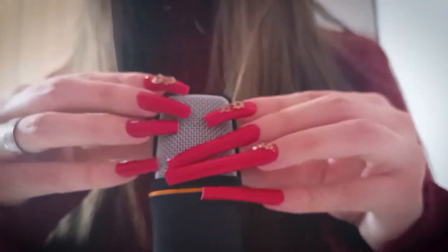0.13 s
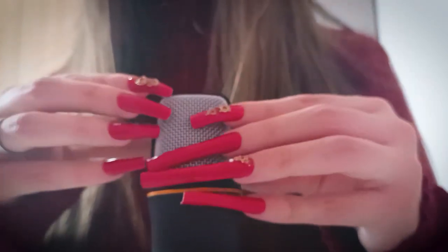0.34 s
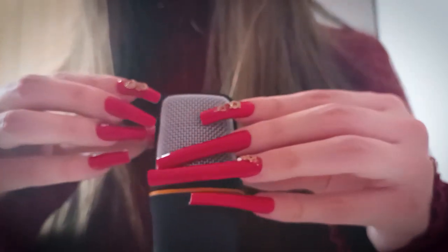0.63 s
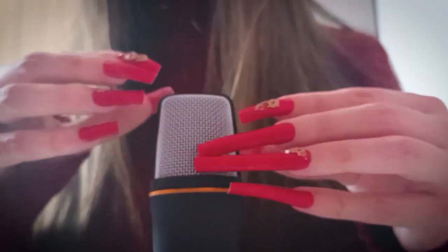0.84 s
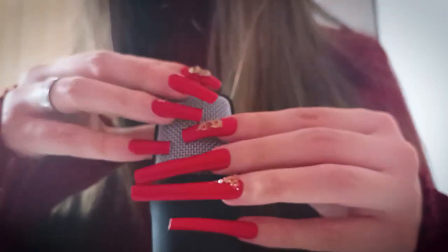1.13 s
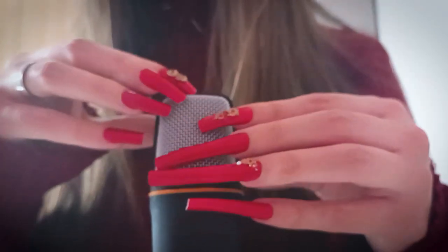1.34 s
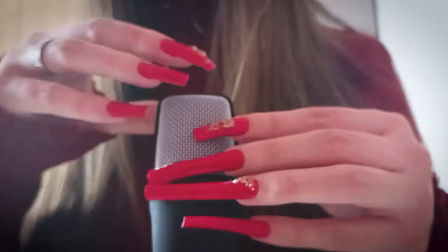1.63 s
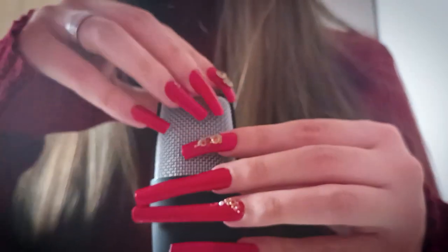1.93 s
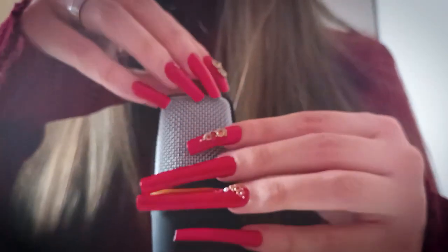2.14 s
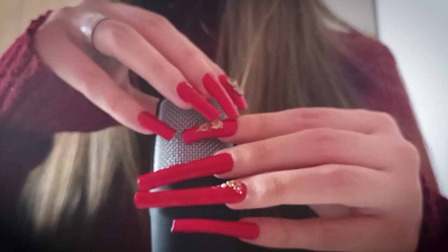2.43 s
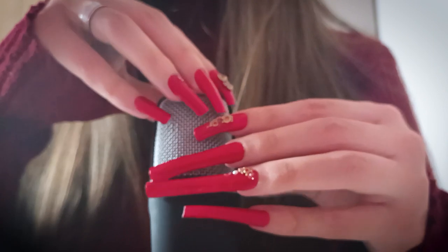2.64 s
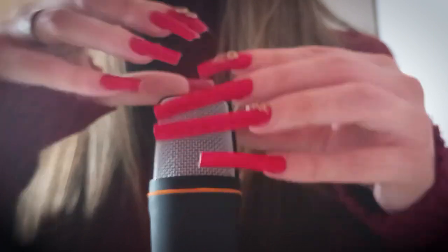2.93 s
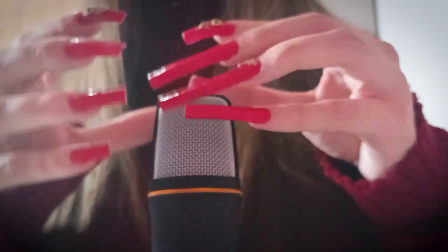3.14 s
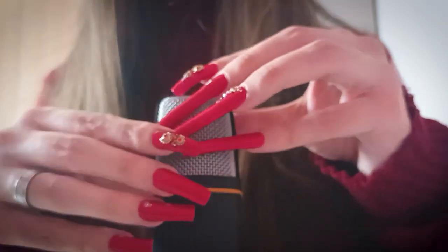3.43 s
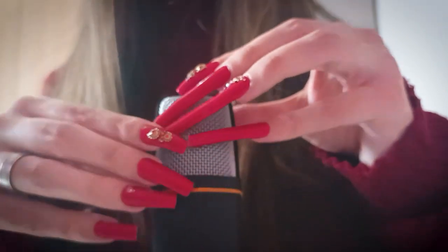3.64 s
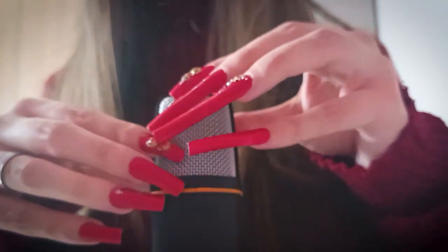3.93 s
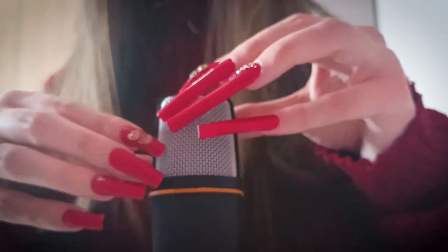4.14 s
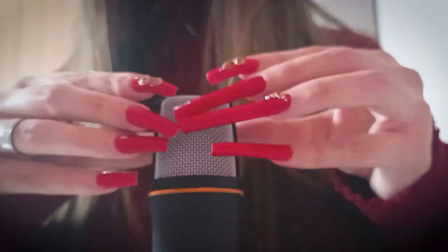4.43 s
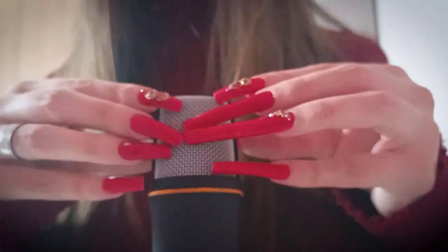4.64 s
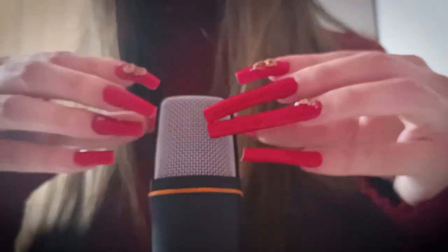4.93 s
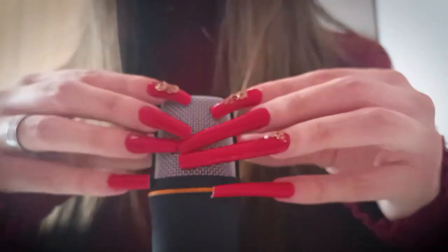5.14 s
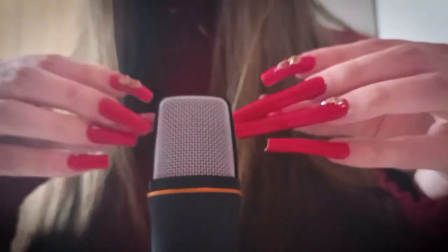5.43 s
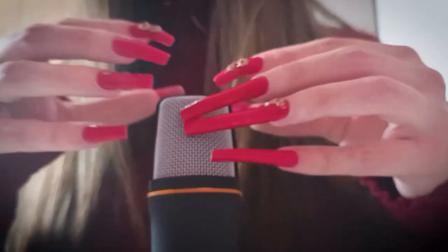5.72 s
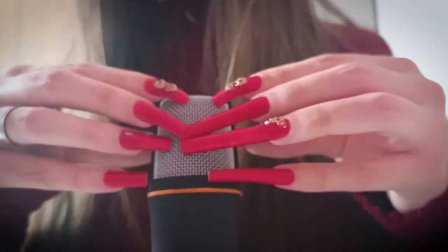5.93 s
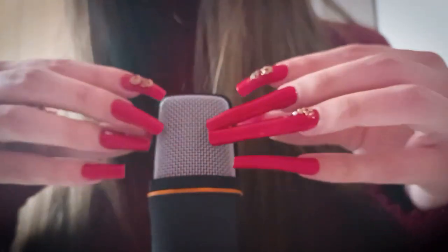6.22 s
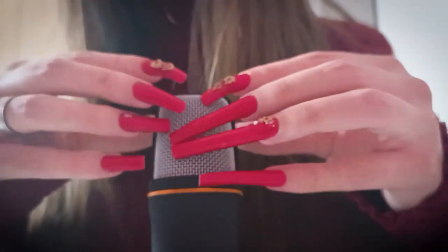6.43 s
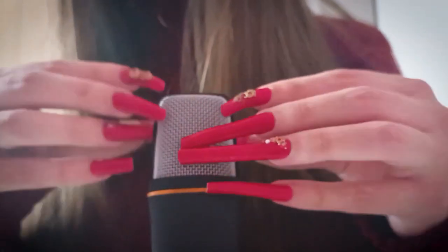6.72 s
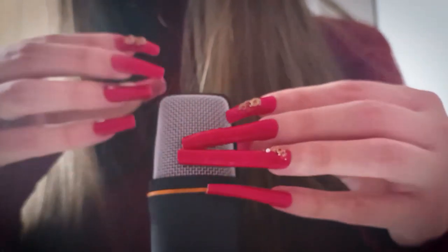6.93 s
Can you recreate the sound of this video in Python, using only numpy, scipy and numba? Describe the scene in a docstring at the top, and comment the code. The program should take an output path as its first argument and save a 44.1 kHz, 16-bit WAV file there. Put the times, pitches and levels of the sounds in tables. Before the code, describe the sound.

Long fingernails scratch directly on the wire mesh of a microphone in quick, uneven strokes with short pauses. Each stroke is a bright, gritty rasp full of tiny clicks as the nails catch and slip, ringing the metal slightly. Finger pressure adds a low rumble, with a few soft bumps just past the middle. The sound is very close and dry, with faint room hiss behind it.

```python
"""Long fingernails scratch right on the wire mesh of a microphone, stroke after stroke with short pauses.
A nail catches on a wire and slips off: a burst of tiny knocks rings the mesh and the basket under it,
and at times the nail itself sings. Finger pressure rumbles through the microphone body, with a few bumps.
Behind it a quiet room hisses and hums; a faint low tone sounds once. Mono, through a quick limiter."""
import sys
import numpy as np
from scipy import signal
from scipy.fft import rfft, irfft
from scipy.io import wavfile
from scipy.ndimage import uniform_filter1d, minimum_filter1d
from numba import njit

SR = 44100
rng = np.random.default_rng(int(sys.argv[2]) if len(sys.argv) > 2 else 0)


def master_out(mix):
    """Clip the mix to full scale and print it as 16-bit PCM to the path in sys.argv[1]."""
    frames = np.transpose(np.atleast_2d(mix))
    ceiling = np.clip(frames, -1, 1)
    pcm = np.round(ceiling * 32767).astype(np.int16)
    wavfile.write(sys.argv[1], SR, pcm)


N = 312228


def undb(db):
    """Decibels to amplitude."""
    return np.exp(np.asarray(db) * np.log(10) / 20)


def unit(x):
    """Scale to an RMS of 1."""
    return x / np.sqrt(np.mean(x ** 2))


def resonate(x, hz, width_hz):
    """Two-pole resonance, gain 1 at the centre."""
    return signal.lfilter(*signal.iirpeak(hz, hz / width_hz, fs=SR), x)


def butter(x, hz, kind, order=4):
    """Butterworth low-pass or high-pass."""
    return signal.sosfilt(signal.butter(order, hz, kind, fs=SR, output="sos"), x)


def wander(rate_hz):
    """Random levels held 1 / rate_hz seconds and slewed; spread near 1."""
    hold = int(SR / rate_hz)
    return uniform_filter1d(np.repeat(rng.standard_normal(N // hold + 1), hold), hold // 4 + 1)[:N]


def bursts(times, sizes, rise_s, fall_s):
    """Envelope of knocks: each builds up to its time and dies away."""
    spikes = np.zeros(N)
    np.add.at(spikes, np.minimum((times * SR).astype(int), N - 1), sizes)
    t = np.arange(-1000, 1001) / SR
    shape = np.exp(np.where(t < 0, t / rise_s, -t / fall_s))
    return np.abs(signal.oaconvolve(spikes, shape, "same"))


@njit
def drifting_mode(x, hz, width_hz):
    """Resonance whose centre and width move every sample."""
    y, band_state, low_state = np.empty(len(x)), 0., 0.
    for i in range(len(x)):
        g, loss = np.tan(np.pi * hz[i] / SR), width_hz[i] / hz[i]
        band = (band_state + g * (x[i] - low_state)) / (1 + g * (g + loss))
        band_state = 2 * band - band_state
        low_state += 2 * g * band
        y[i] = loss * band
    return y


def room_tone(hiss_db=-61.5, hum_hz=119, hum_db=-78):
    """The quiet room around the microphone: a soft hiss that swells slowly, and a hum."""
    # spectrum of the hiss: (frequency [Hz], relative density [dB])
    spectrum = [(24, -43.5), (55, -13), (124, -4), (151, -22), (294, -10), (384, -24), (448, -18),
                (2470, -27), (3760, -20.5), (7000, -40.5), (10400, -77.5)]
    hz, db = np.transpose(spectrum)
    bin_hz = np.arange(N // 2 + 1) * SR / N + 1
    colour = undb(np.interp(np.log(bin_hz), np.log(hz), db))
    hiss = unit(irfft(rfft(rng.standard_normal(N)) * colour, N))
    hum = np.sin(2 * np.pi * hum_hz * np.arange(N) / SR)
    return undb(hiss_db + 1.1 * wander(1.4)) * hiss + undb(hum_db) * hum


def room_dip(drag, dip_db=-4, hold_s=0.1347):
    """Gain of the room tone: it dips while the nails drag and for a moment after."""
    span = int(hold_s * SR) // 2 * 2 + 1
    idle = minimum_filter1d(1. * (drag < 1e-3), span, origin=span // 2)
    return undb(dip_db * (1 - uniform_filter1d(idle, size=441)))


def faint_tone(centre_s=5.47, half_length_s=.035, hz=430, db=-52):
    """A soft, slightly wavering low tone after one stroke."""
    shape = np.exp(-((np.arange(N) / SR - centre_s) / half_length_s) ** 4)
    return undb(db) * shape * unit(resonate(rng.standard_normal(N), hz, width_hz=6.2))


def finger_bumps():
    """A finger bumps the microphone: a short shove, then the body swings out."""
    # bumps on the body: (time [s], relative level [dB])
    bumps = [(4.079, -8.5), (4.112, -10.5), (4.148, -2)]
    times, db = np.transpose(bumps)
    shove = butter(bursts(times, undb(db), 0.00038, 0.00017), 60, "high", order=2)
    return shove + undb(1.5) * resonate(shove, hz=140, width_hz=60)


def handling_rumble(slip):
    """Finger pressure shakes the microphone body in uneven low thuds, harder on each slip."""
    pressure = rng.standard_normal(N) * undb(4.3 * np.minimum(wander(40), 1)) * slip ** 0.43
    shake = butter(butter(pressure, 58, "high"), 780, "low")
    return unit(resonate(shake, 110, 130) + undb(-28) * resonate(shake, 390, 430))


def stroke_gains(top_share=0.666, ease_db=4, lift_db_per_s=1505):
    """Gains of basket drag, mesh drag and rumble: a stroke swells, eases off and stops as the nails lift."""
    # strokes over the mesh, with the relative levels at their tops:
    # (start [s], length [s], basket drag [dB], mesh drag [dB], rumble [dB], swell from start to top [dB])
    strokes = [(0, 0.048, -28.5, -29, -48, -0.5), (0.066, 0.061, -38, -45.5, -42, -4),
               (0.151, 0.16, -34, -38, -40.5, 13.5), (0.266, 0.1475, -25, -34.5, -34.5, 4.5),
               (0.459, 0.06, -42.5, -46.5, -37.5, 6), (0.516, 0.2964, -28, -27, -35, 2.5),
               (0.791, 0.061, -39.5, -51.5, -76.5, 7.5), (1.055, 0.021, -27, -30.5, -43.5, 8),
               (1.097, 0.061, -42.5, -45, -34.5, 7.5), (1.162, 0.314, -29.5, -30.5, -31.5, 2),
               (1.495, 0.22, -27.5, -27.5, -41, 6.5), (1.731, 0.13, -56.5, -56.5, -46.5, 2.5),
               (1.83, 0.0293, -42, -35, -44.5, -3), (1.885, 0.2, -26.5, -27.5, -30.5, 7.5),
               (2.107, 0.037, -25.5, -29.5, -34, 2), (2.169, 0.024, -21, -23.5, -41, -2.5),
               (2.303, 0.1464, -34, -38.5, -50.5, -3.5), (2.472, 0.128, -37, -51.5, -47.5, 3),
               (2.566, 0.25, -37, -41.5, -39.5, 1), (2.698, 0.1286, -21, -24, -32.5, 4),
               (3.1512, 0.127, -39.5, -35, -66.5, 0.5), (3.304, 0.077, -35.5, -46.5, -50.5, 3),
               (3.394, .15, -33, -30, -38, 4.5), (3.551, 0.16, -30, -30, -34, 13.5),
               (3.902, 0.044, -27.5, -29.5, -33.5, 3), (3.971, 0.077, -41.5, -52, -34, 6),
               (4.001, 0.23156, -27.5, -24, -35.5, 5), (4.498, 0.11, -30, -33, -34.5, 6.5),
               (4.616, 0.21605, -26.5, -24, -35, 7), (5.122, 0.29555, -24.5, -21.5, -30, 12.5),
               (5.721, 0.1342, -36, -36.5, -57.5, -1.5), (5.905, 0.26915, -28, -25.5, -34.5, 3.5),
               (6.267, 0.2, -37, -35.5, -53, 1), (6.442, 0.29, -25.5, -24.5, -34.5, 5.5),
               (6.716, 0.1139, -22.5, -25.5, -26, 15.5), (6.827, .05, -38.5, -52.5, -66, 12.5),
               (6.891, 0.12, -30, -29.5, -43, 16)]
    t, gains = np.arange(N) / SR, np.full((3, N), 1e-9)
    for start, length, *top_db, swell_db in strokes:
        end = start + length
        on = slice(int(start * SR), int((end + .05) * SR))
        shape_db = np.interp(t[on], [start, start + top_share * length, end], [-swell_db, 0, -ease_db])
        shape_db -= lift_db_per_s * np.maximum(t[on] - end, 0)
        gains[:, on] += undb(np.add.outer(top_db, shape_db))
    slew_s = np.array([0.0011, 0.0011, 0.0024])
    poles = np.exp(-1 / (slew_s * SR))
    return [signal.lfilter([1 - pole], [1, -pole], gain) for pole, gain in zip(poles, gains)]


def wire_slips(count=900):
    """The nails ratchet from wire to wire over a fine scrape: force envelopes on basket and mesh."""
    # capped: a wire lets go before the pull grows large
    jitter, pull, mesh_pull = np.clip(rng.standard_normal((count, 3)).T, -3, 0.95)
    times = np.clip((np.arange(count) + 0.3854 * jitter) / count, 0, 1) * N / SR
    scrape = undb(9.1 * np.minimum(wander(60), .8))
    on_basket = unit(bursts(times, undb(4.1 * pull), 0.0011, 0.0022))
    on_mesh = unit(bursts(times, undb(3.2 * mesh_pull + 2.5 * pull), .0003, .0009))
    return unit(on_basket + 0.22 * scrape), unit(on_mesh + 0.34 * scrape)


def ring(force, modes, vary_db, bend_widths, damp_db, rate_hz=90):
    """Slips land in different spots, so each mode varies in drive and pitch; the fingers damp them all."""
    damping = undb(damp_db * np.maximum(wander(rate_hz / 2), 0))
    out = np.zeros(N)
    for k, (hz, width_hz, db) in enumerate(modes):
        drive = force * undb(vary_db * wander(rate_hz)) * damping
        bent_hz = hz + bend_widths * width_hz * wander(rate_hz / 2)
        out += (-1) ** k * undb(db) * drifting_mode(drive, bent_hz, width_hz * damping)
    return out


def singing_nail(force, rise_hz_per_s=1700, width_hz=116):
    """The nail itself sings at times: a resonance that rises as it slides."""
    # singing slides: (start [s], length [s], first pitch [Hz], gain [dB])
    slides = [(0.29, 0.09, 1029, -10), (5.72, 0.1244, 1150, -2.5), (0.8107, 0.13, 1340, 6),
              (3.311, 0.032, 1324, -2), (6.255, 0.1325, 1167, -2.5)]
    out = np.zeros(N)
    for start, length, hz, db in slides:
        t = np.arange(int(length * SR)) / SR
        on = slice(int(start * SR), int(start * SR) + len(t))
        glide = np.exp(2j * np.pi * (hz * t + rise_hz_per_s * t ** 2 / 2))
        # shift down by the pitch, smooth, shift back
        rung = butter(force[on] / glide, width_hz / 2, "low", order=1) * glide
        out[on] += undb(db) * np.sqrt(np.hanning(len(t))) * 2 * rung.real
    return out


def basket_ring(force):
    """The basket under the mesh rings in the midrange, joined by the singing nail."""
    # basket modes: (frequency [Hz], width [Hz], gain [dB])
    modes = [(920.2, 247.2, -13.5), (1027.5, 64.2, -0.4961), (1346, 668, -16.5), (1661.7, 294, -13.5),
             (2194.7, 190, -20.5)]
    rung = ring(force, modes, vary_db=2.32, bend_widths=0.13, damp_db=2.54) + singing_nail(force)
    return butter(butter(rung, 6900, "low"), 580, "high", order=2)


def mesh_ring(force):
    """The mesh rings brightly under the knocks."""
    # mesh modes: (frequency [Hz], width [Hz], gain [dB])
    modes = [(2706, 140, -2), (3547.4, 130, 8), (4060, 721, 4), (4635.6, 130, 4), (5136, 38, 10.5),
             (5233, 473.6, 6.5), (6510, 480, -23.5)]
    rung = ring(force, modes, vary_db=2.2, bend_widths=0.3, damp_db=2.093)
    return butter(butter(rung, 6430, "low", order=8), 1600, "high", order=2)


def wire_ring(force):
    """Single wires ring in the top treble; each is filtered twice, so the gaps between them stay dark."""
    # wire modes: (frequency [Hz], width [Hz], gain [dB])
    modes = [(8420, 430, -22.5), (9272, 1000, -22.5), (11550, 600, -38.5), (15400, 900, -30)]
    # course of the wires' treble: (time [s], gain [dB])
    treble = [(1.3, 5), (1.52, -1.5), (1.9, 0), (2.4, -1), (3.599, 2.5), (4.6, 0.5), (6.0, 2), (6.35, -3.5),
              (6.6, 0.5)]
    rung = np.zeros(N)
    for hz, width_hz, db in modes:
        drive = force * undb(3.3 * wander(150))
        rung += undb(db) * resonate(resonate(drive, hz, width_hz), hz, width_hz)
    return undb(np.interp(np.arange(N) / SR, *np.transpose(treble))) * butter(rung, 5800, "high")


def scratching_nails(basket_drag, mesh_drag, build_s=.0007):
    """The drag of the nails, with the loud catches on top, rings basket, mesh and single wires."""
    # the loudest catches of a nail: (time [s], relative mesh peak [dB], relative basket peak [dB])
    catches = [(0.01, -11, -31.5), (0.08, -22.5, -10), (0.1029, -8, -4), (0.137, -16, -1), (0.199, -7, -11),
               (0.252, -10, -21), (0.312, -24.5, -6.5), (0.383, -20, -17), (0.5272, -11, -8.5),
               (0.5373, -8.5, -30.5), (0.5651, -5, -24.5), (0.5921, -8.5, -30), (0.6228, -17.5, -1),
               (0.7, -6.5, -34), (1.061, -19, -21.5), (1.099, -10.5, -32.5), (1.1326, -9, -7),
               (1.144, -15.5, -20.5), (1.202, -14.5, -4), (1.239, -18.5, 0), (1.257, -13.5, -1),
               (1.288, -11.5, -22.5), (1.311, -18.5, -10), (1.3425, -10, -11), (1.3541, -10, -28),
               (1.3827, -9, -7), (1.4147, -7, -22), (1.6602, -11.5, -25), (1.744, -8, -39),
               (1.8277, -10, -51.5), (1.874, -9.5, -23.5), (1.9287, -10, -9), (1.959, -10, -7.5),
               (1.9689, -9, -2), (1.995, -14.5, -5.5), (2.019, -16.5, -1), (2.033, -17, 0),
               (2.1105, -9.5, -4.5), (2.12, -13.5, -6.5), (2.131, -15.5, -5.5), (2.1717, -15, -10),
               (2.181, -17, -3.5), (2.2915, -15.5, -45), (2.3317, -13.5, -15.5), (2.3785, -14.5, -9),
               (2.4348, -7.5, -3), (2.4824, -12, -17.5), (2.5798, -10.5, -1.5), (2.6036, -12, -1),
               (2.6463, -5.5, 0.5), (2.683, -16.5, -7), (2.7, -19, -12.5), (2.7702, -6, -4.5),
               (3.159, -5, -8), (3.183, -7.5, -5.5), (3.189, -8.5, -26.5), (3.206, -10, -13.5),
               (3.211, -5.5, -12), (3.2269, -14, -37), (3.2377, -9, -41.5), (3.254, -12.5, -28.5),
               (3.316, -12, -9), (3.4212, -11, -6.5), (3.465, -9.5, -16.5), (3.478, -12, -32.5),
               (3.4854, -8, -8), (3.5367, -11.5, -34.5), (3.561, -3, -24), (3.578, -10, -39),
               (3.597, -10.5, -5), (3.641, -23, -10), (3.6743, -14.5, -5.5), (3.9067, -13.5, -36.5),
               (4.0202, -14, -17.5), (4.029, -9.5, -20.5), (4.052, -11.5, -29.5), (4.0789, -10, -8.5),
               (4.426, -37, -71), (4.4995, -14.5, -3.5), (4.546, -23, -4), (4.554, -13, -37),
               (4.6043, -12, -7.5), (4.6259, -15.5, 2), (5.124, -18.5, -14), (5.1753, -15.5, -6.5),
               (5.3066, -20, -3.5), (5.3313, -11.5, -10.5), (5.731, -14.5, 3), (5.745, -30, -2),
               (5.771, -21.5, -4.5), (5.786, -21, -4.5), (5.8132, -17.5, -4.5), (5.8347, -17, -2.5),
               (5.877, -23.5, -20.5), (5.91, -14, -11.5), (5.9614, -14, -21), (6.0123, -15.5, -2.5),
               (6.0581, -13.5, -6), (6.1056, -8, -25), (6.1333, -13.5, -38), (6.269, -21.5, -4),
               (6.277, -15, -9), (6.2884, -21, -4), (6.3, -23, -9.5), (6.314, -33, -4.5),
               (6.324, -38.5, -13.5), (6.3374, -15, -7.5), (6.36, -18, -23.5), (6.381, -21.5, -9),
               (6.4131, -12, -36), (6.4907, -12.5, -4.5), (6.5558, -17, -0.5), (6.633, -10, 4.5),
               (6.73, -7.5, -33), (6.7546, -11, -27), (6.7744, -10, -32), (6.903, -15.5, -12.5),
               (6.942, -5.5, -25), (6.9812, -7.5, -36), (6.9882, -14, 3.5), (7.0181, -13.5, -18.5)]
    catch_s, mesh_db, basket_db = np.transpose(catches)
    slip_s = catch_s + build_s  # a catch builds up before the nail slips off
    grit = rng.standard_normal((2, N)) * undb(3.745 * rng.standard_normal((2, N)))  # uneven knocks
    basket_load = undb(26.5) * basket_drag + undb(7) * bursts(slip_s, undb(basket_db), 0.0007, 0.00086)
    mesh_load = undb(6.5) * mesh_drag + undb(2.5) * bursts(slip_s, undb(mesh_db), 0.00062, 0.001868)
    mesh_knocks = mesh_load * grit[1]
    # the slip itself is one clean blow: a longer push on the basket, a snap on the mesh
    push = undb(19.5) * bursts(slip_s, undb(basket_db), .0001, .000085)
    snap = undb(-4) * bursts(slip_s, undb(mesh_db), .00002, .00004)
    basket = basket_ring(basket_load * grit[0] + push + undb(5.5) * mesh_knocks)
    mesh = mesh_ring(mesh_knocks + undb(13) * snap)
    hardness = (mesh_load / mesh_load.std()) ** 0.21  # single wires speak mostly on hard knocks
    return basket + mesh + wire_ring(mesh_knocks * hardness + snap)


def scene():
    """Nails and handling noise directly on the microphone, the room far behind; one channel."""
    basket_gain, mesh_gain, rumble_gain = stroke_gains()
    basket_slip, mesh_slip = wire_slips()
    nails = scratching_nails(basket_gain * basket_slip, mesh_gain * mesh_slip)
    handling = rumble_gain * handling_rumble(basket_slip) + finger_bumps()
    background = faint_tone() + room_dip(basket_gain) * room_tone()
    return (nails + handling + background)[None]


def record(dry, limit_db=-8, limit_share=.55, top_hz=16000):
    """A quick limiter takes back a share of what passes limit_db, and the top is cut."""
    peak = uniform_filter1d(-minimum_filter1d(-np.abs(dry), size=133), size=133)  # 3 ms windows
    gain = np.maximum(peak / undb(limit_db), 1) ** -limit_share
    return signal.sosfilt(signal.ellip(10, .2, 70, top_hz, fs=SR, output="sos"), dry * gain)


dry = scene()
out = record(dry)
master_out(out)
```